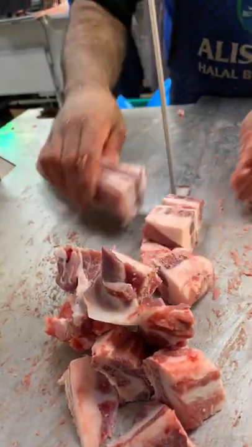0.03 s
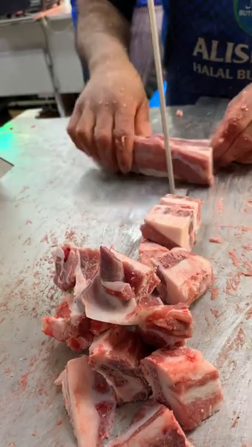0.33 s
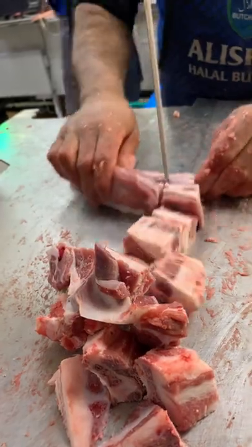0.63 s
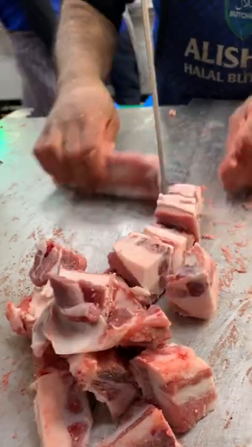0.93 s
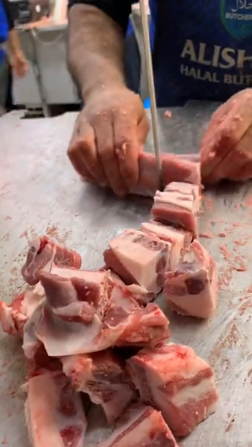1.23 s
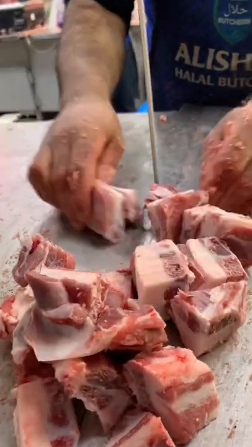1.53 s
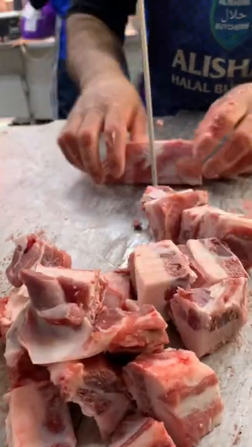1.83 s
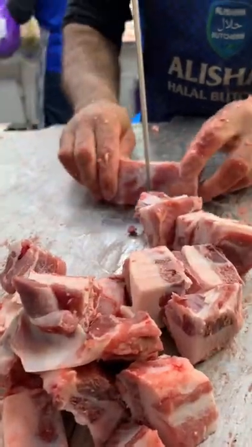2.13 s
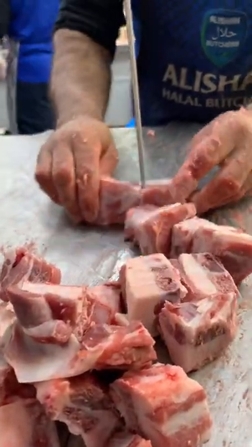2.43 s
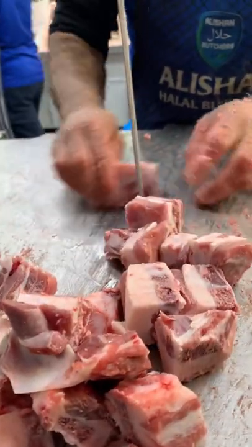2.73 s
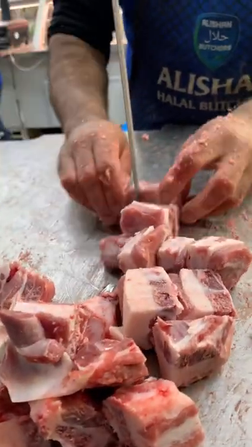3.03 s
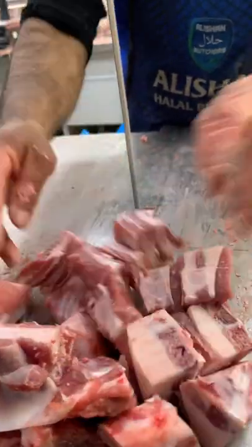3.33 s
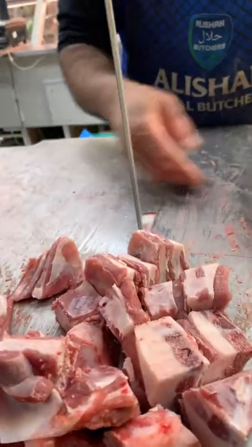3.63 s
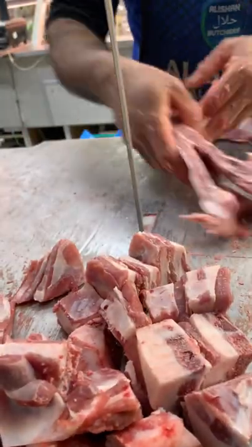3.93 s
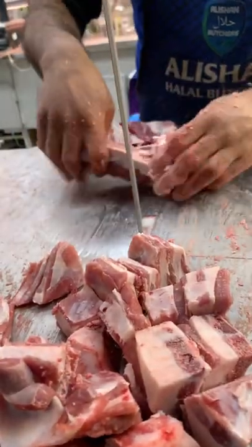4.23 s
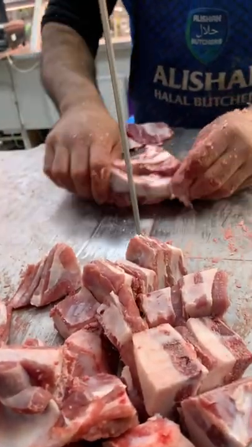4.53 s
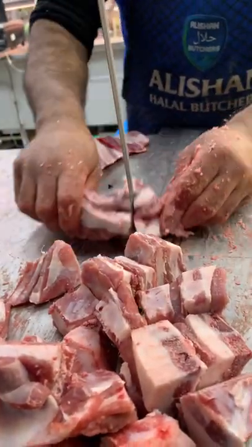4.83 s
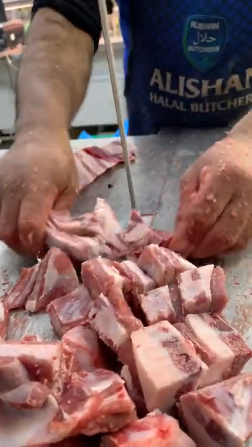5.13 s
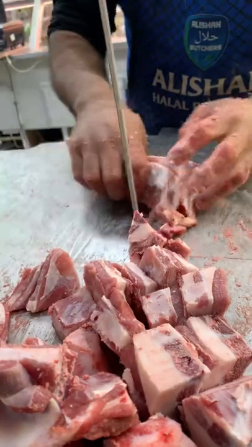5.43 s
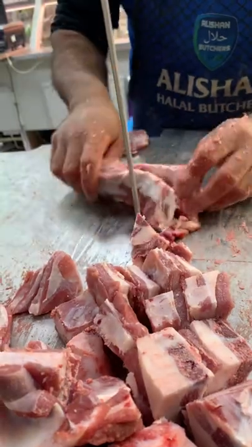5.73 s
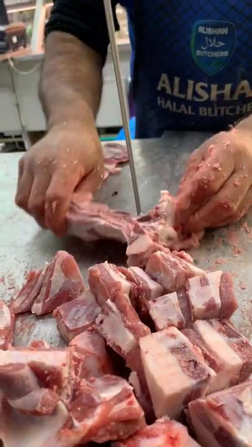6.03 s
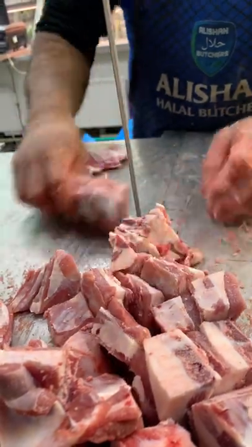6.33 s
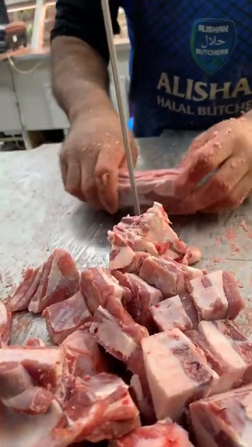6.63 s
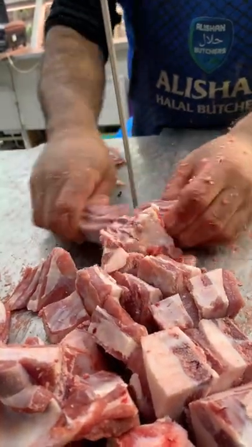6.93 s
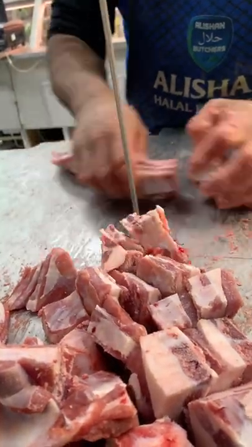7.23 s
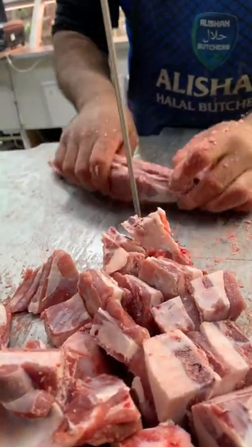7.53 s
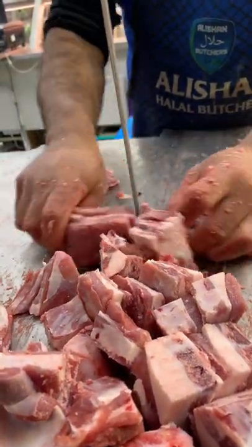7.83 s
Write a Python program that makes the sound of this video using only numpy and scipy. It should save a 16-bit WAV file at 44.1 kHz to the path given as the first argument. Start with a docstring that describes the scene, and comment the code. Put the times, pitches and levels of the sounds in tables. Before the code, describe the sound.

A butcher's bandsaw hums and hisses steadily while its blade rasps and screeches through meat and bone in eight short cuts.

```python
"""A butcher's bandsaw in the shop, close to a two-port stereo microphone. From the start the motor hums
and the blade hisses in its guides and rings the steel table. From 0.5 s four pieces of meat and bone go
through: the teeth rasp, sing on their passing rate, bite and screech, and the motor sags a little.
After 3.5 s wet meat ticks on the table. From 4.7 s come four more cuts, louder, and the recorder's
gain control ducks the hum after the loudest."""
import sys
import numpy as np
from scipy import signal
from scipy.fft import rfft, irfft, next_fast_len
from scipy.io import wavfile
from scipy.ndimage import uniform_filter1d, minimum_filter1d

SR = 44100
rng = np.random.default_rng(int(sys.argv[2]) if len(sys.argv) > 2 else 0)


def unload_wav(signal):
    """Save mono or channel-first audio to the path in sys.argv[1] as 16-bit WAV at rate SR, clipped to [-1, 1]."""
    wavfile.write(
        sys.argv[1],
        SR,
        np.round(np.clip(np.atleast_2d(signal).T, -1, 1) * 32767).astype(np.int16),
    )


N = 352359
T = np.arange(N) / SR
SHAFT_HZ, TOOTH_HZ = 25.0, 1846  # shaft turns and passing teeth per second, unloaded

# Levels in the tables are relative: each source adds its own gain.
# the saw swells and fades as the microphone moves: (time [s], hum [dB], hiss [dB], fizz [dB])
MIC_NEARNESS = [(0, -0.5, -37.5, -39.5), (1.5, 0.5, -39.5, -42), (3.1, 1, -41, -42), (4.3, 1, -38.5, -40.5),
                (5.7, 2.5, -37, -40), (6.5, 0, -39.5, -42.5), (7.99, -1.5, -38.5, -41)]
# motor hum: (multiple of the shaft rate, level [dB])
HUM_ORDERS = [(2, -52.5), (3, -60), (4, -46), (5, -41.5), (6, -52), (7, -32.5), (9, -70.5), (10, -55.5),
              (11, -46), (15, -70), (19, -57.5), (20, -60.5)]
# two higher motor whines as the microphone moves: (time [s], order 17 [dB], order 36 [dB])
MOTOR_WHINES = [(0, -47, -45), (.7, -41.5, -44), (1, -44, -56), (2.3, -43.5, -54.5), (3.1, -39.5, -54),
                (3.9, -42.5, -51), (5.7, -40.5, -54), (6.5, -45.5, -49.5), (7.99, -43, -50.5)]
# cabinet rumble: (frequency [Hz], level [dB])
RUMBLE_SPECTRUM = [(20, -31), (33, -19), (45, -15), (80, 1.5), (140, 1.5), (230, 2), (330, -10), (480, -8),
                   (750, -25), (1500, -30)]
# blade rubbing in its guides: (frequency [Hz], level [dB])
HISS_SPECTRUM = [(300, -17), (750, -4), (1000, -7.5), (1450, -2.5), (2000, -2.5), (2900, -9.5), (4200, -4),
                 (5800, -10), (8000, -34)]
# fine hiss of the teeth in the air: (frequency [Hz], level [dB])
FIZZ_SPECTRUM = [(2500, -5), (4800, -46), (6000, 9), (7500, 9.5), (9000, 5.5), (11000, 0.5), (12500, 7),
                 (14000, 2.5), (15500, -44)]
# ring of blade and table: (frequency [Hz], width [Hz], level [dB])
STEEL_MODES = [(1130, 180, 2), (1286, 9.5, 7), (1511, 59, 5.5), (1892, 41, 6.5), (2032, 68, 5.5),
               (2330, 140, -4), (2478, 87, 7), (2670, 39, 12.5), (2920, 74, 11), (3150, 40, 10),
               (3450, 100, 6.5), (3658, 56, 9.5), (4175, 44, 4.5), (4640, 46, 2.5), (4880, 52, 7.5),
               (5400, 68, 5.5)]
# a narrow band of hiss that drifts between 6.4 and 7 kHz: (time [s], frequency [Hz], level [dB])
DRIFTING_HUMP = [(0, 6380, -47.5), (2.2, 6520, -42.5), (3.3, 6670, -49.5), (5.5, 6990, -44),
                 (7.99, 6600, -48)]
# three resonances of the free blade: (frequency [Hz])
WHIRR_PITCHES = [1983, 2687, 3660]
# their unsteady strength: (time [s], low [dB], middle [dB], high [dB])
WHIRR_LEVELS = [(0, -47, -48, -66), (1.6, -52, -75, -55), (3.2, -45.5, -59, -48), (3.9, -48, -48.5, -53.5),
                (4.5, -42.5, -46, -45), (5.7, -56, -47, -45.5), (6.5, -53, -51, -40.5),
                (7.99, -45, -48, -46)]
# meat handled on the table: (time [s], level [dB], decay [s])
MEAT_TICKS = [(3.501, -31, .004), (3.6233, -27, 0.004), (3.9371, -35, .004), (5.498, -34, 0.0044),
              (7.42, -39, .004)]
# pieces pushed through the blade:
# (time [s], length [s], ease-in [s], ease-out [s], rasp [dB], push change by the end [dB], drag [dB])
PIECES = [(0.468, 0.21, 0.011, 0.032, -27.5, 2.5, -56), (1.195, 0.18, 0.034, 0.036, -26.5, 0, -52),
          (2.26, 0.2, 0.13, .03, -27, -10, -60), (2.95, 0.12, 0.049, 0.021, -29.5, -5, -54),
          (4.675, 0.23, 0.018, 0.11, -24, 3.5, -44), (5.841, 0.13, 0.041, 0.099, -20, 1.5, -53),
          (6.755, 0.19, 0.032, 0.027, -27.5, -15, -43), (7.632, 0.17, 0.015, 0.018, -12, -10, -45)]
# teeth meeting a hard wall of bone: (peak time [s], length [s], rasp [dB], grinding [dB], singing [dB])
BONE_BITES = [(0.462, 0.0056, -24.5, -38, -54), (0.489, 0.015, -20, -39, -57),
              (0.521, 0.019, -19, -38, -38), (0.56, 0.03, -31, -30, -43), (0.595, 0.0065, -22, -29, -47),
              (0.609, 0.012, -25, -34, -28.5), (0.645, 0.0046, -24, -33, -33),
              (1.231, 0.031, -31, -30, -52), (1.279, 0.036, -22.5, -29, -28),
              (1.338, 0.027, -27, -27.5, -34), (1.379, 0.024, -30.5, -33.5, -52),
              (2.331, 0.075, -19.5, -33.5, -32), (2.385, 0.029, -31, -31, -35),
              (2.449, 0.04, -24.5, -33, -44), (2.986, 0.036, -21, -32.5, -34),
              (3.048, 0.026, -25, -28.5, -32), (4.656, 0.0076, -25, -35, -46),
              (4.69, 0.015, -21, -26.5, -45), (4.744, 0.04, -35, -26, -49),
              (4.826, 0.063, -18.5, -22.5, -37), (4.889, 0.052, -22, -24, -26),
              (5.846, 0.019, -18, -27, -24.5), (5.88, 0.021, -11, -28, -53),
              (6.773, 0.023, -18.5, -25, -31), (6.831, 0.029, -16.5, -21.5, -38),
              (6.875, 0.04, -17, -20.5, -28), (7.623, 0.017, -12.5, -37, -41),
              (7.64, 0.022, -22, -25.5, -20), (7.733, 0.015, -24, -25, -12),
              (7.771, 0.046, -34, -26.5, -23.5)]
# rasp of the teeth: (frequency [Hz], level [dB])
RASP_SPECTRUM = [(300, -73), (800, -23.5), (1400, 1), (2100, -52), (3000, -14.5), (4500, -7), (6000, 4),
                 (7000, 9.5), (8200, 9.5), (9700, -5.5), (10500, 9.5), (11500, 9.5), (13000, 10),
                 (14300, 13.5), (15500, -20)]
# grinding in bone: (frequency [Hz], level [dB])
GRIND_SPECTRUM = [(500, -1), (1400, -8.5), (2050, 10.5), (2800, 2), (3600, 13), (4500, 3.5), (6000, -67),
                  (10000, -32)]
# low tooth tone, following the singing: (multiple of the tooth rate, level [dB])
SING_PARTIALS = [(1, 6.5), (2, -11.5), (3, 1.5)]
# high tooth tone, following the rasp: (multiple of the tooth rate, level [dB])
RASP_PARTIALS = [(3, 4), (4, 11.5), (5, 14.5), (6, 17), (7, 15), (8, -18.5)]
# the blade is pinched: (peak time [s], multiple of the tooth rate, level [dB], length [s])
PINCH_SQUEALS = [(.494, 4, -17, 0.0083), (.517, 7, -20, .012), (.65, 6, -15, 0.0091), (1.26, 7, -21, 0.031),
                 (1.265, 4, -32, 0.033), (1.282, 2, -38, .024), (1.345, 2, -29, 0.04),
                 (1.37, 4, -24, 0.025), (2.31, 6, -28, 0.039), (2.3, 4, -28, 0.045),
                 (2.332, 7, -25.5, .018), (2.317, 2, -38, 0.1), (2.447, 4, -22.5, .007),
                 (2.457, 2, -21.5, 0.011), (2.986, 2, -31, 0.035), (3.045, 2, -29, 0.035),
                 (2.985, 4, -26, 0.054), (3.041, 4, -19.5, 0.025), (4.698, 4, -14, 0.0097),
                 (4.74, 6, -17, 0.054), (4.774, 7, -15, 0.018), (4.82, 2, -22, 0.069),
                 (4.897, 2, -18, 0.018), (4.881, 3, -13.5, 0.01), (5.89, 6, -24, 0.011),
                 (5.959, 4, -15.5, 0.033), (5.955, 7, -21, 0.047), (6.822, 3, -18, 0.011),
                 (6.825, 4, -20, 0.02), (6.831, 7, -17, 0.015), (6.874, 5, -18, 0.03),
                 (6.86, 2, -22.5, 0.058), (6.879, 7, -16, .012), (6.883, 3, -17, 0.025),
                 (7.612, 2, -25, 0.0085), (7.651, 3, -20, .009), (7.713, 3, -24, 0.015),
                 (7.764, 6, -12.5, 0.015)]
# the blade twists in bone:
# (peak time [s], frequency [Hz], glide [Hz/s], width [Hz], level [dB], length [s])
TWIST_SCREECHES = [(.497, 2380, -8000, 300, -32, .008), (0.53, 5650, 0, 500, -33, .016),
                   (0.568, 3050, 3000, 300, -27, 0.015), (0.563, 6240, 0, 700, -24, .011),
                   (.597, 6700, 0, 1300, -18, 0.0043), (.597, 9600, 0, 1800, -18, .004),
                   (1.249, 1996, -1000, 220, -32, 0.049), (1.292, 5900, 8000, 900, -35, 0.018),
                   (1.342, 2050, 0, 250, -27, .014), (1.343, 4500, 0, 250, -40, .025),
                   (2.34, 5730, 0, 600, -36, .03), (2.441, 3430, 8000, 250, -28, .02),
                   (3.02, 6720, 0, 1200, -29, 0.048), (3.031, 5770, 0, 550, -29, 0.012),
                   (4.668, 12200, 0, 1800, -20, .005), (4.722, 12100, 12, 1710, -18.5, 0.064),
                   (4.78, 2060, 0, 250, -26, 0.0036), (4.816, 7030, -3000, 602, -21, 0.035),
                   (4.865, 1990, -2000, 296, -37, 0.04), (5.843, 3300, -10000, 502, -32, 0.012),
                   (5.852, 10430, 0, 500, -16, 0.0078), (5.853, 6760, 15000, 450, -18, 0.0074),
                   (5.86, 4830, -20000, 702, -27, 0.013), (6.782, 2378, 0, 403.3, -22, 0.0065),
                   (6.829, 4530, 6002, 1100, -23, 0.039), (6.831, 5990, -10000, 803, -26, 0.015),
                   (6.839, 7030, -20000, 385, -11, 0.0066), (7.616, 7080, 0, 700, -34, 0.0048),
                   (7.648, 6250, 0, 905, -31, .009), (7.722, 3680, 0, 220, -20, 0.034),
                   (7.761, 1890, 0, 179, -28, 0.042)]
# how alike the two microphone ports sound: (frequency [Hz], likeness [0-1])
PORT_LIKENESS = [(60, .995), (200, .95), (450, .8), (800, .6), (2200, .55), (3000, .4), (3700, .22),
                 (4300, .45), (5000, .8), (7000, .94), (15000, .94)]
# the machine reaches the left port first: (frequency [Hz], phase lead [rad])
MACHINE_PHASE = [(60, 0), (170, .25), (450, .8), (850, 2.5), (1450, .6), (2000, 1.7), (3000, 3.2),
                 (4900, 3.2), (6900, 6.28), (9700, 9.42), (12400, 12.57), (15100, 15.7)]
# the cut at the left port against the right: (frequency [Hz], phase lead [rad])
CUT_PHASE = [(60, 0), (500, -1), (1000, -2.6), (1900, -.5), (2600, -2.8), (3200, -3.2), (4900, -3.1),
             (6900, 0), (9700, 3.14), (12400, 6.28), (15100, 9.42)]


def gain_of(db):
    """Decibels to amplitude."""
    return 10 ** (np.asarray(db) / 20)


def evened(x):
    """Scales to rms 1."""
    return x / np.sqrt(np.mean(x ** 2) + 1e-20)


def read(points, hz):
    """Reads a table on a log-frequency axis."""
    f, value = np.transpose(points)
    return np.interp(np.log(hz + 1), np.log(f + 1), value)


def curve(rows, column):
    """One column of a table over time."""
    rows = np.array(rows)
    return np.interp(T, rows[:, 0], rows[:, column])


def swell(s, length):
    """A smooth rise and fall that peaks at time s."""
    return np.exp(-2 * np.minimum(((T - s) / length) ** 2, 20))


def lagged(x, lag_s):
    """Follows x sluggishly."""
    keep = np.exp(-1 / (lag_s * SR))
    return signal.lfilter([1 - keep], [1, -keep], x)


def drift(rate_hz, step=32):
    """Smooth random wander of rms 1, no faster than about rate_hz."""
    count = N // step + 2
    rolloff = 1 + (np.fft.rfftfreq(count, step / SR) / rate_hz) ** 4
    slow = irfft(rfft(rng.standard_normal(count)) / rolloff, count)
    return np.interp(np.arange(N) / step, np.arange(count), evened(slow))


def flicker(depth_db, rate_hz=90):
    """Quick random changes of gain, of rms 1."""
    return evened(gain_of(depth_db * np.tanh(drift(rate_hz))))


def filtered(x, response):
    """Applies a frequency response, given as a function of Hz."""
    size = next_fast_len(N + 4096, True)
    return irfft(rfft(x, size) * response(np.fft.rfftfreq(size, 1 / SR)), size)[..., :N]


def noise(colour, gate=1):
    """Two streams of gated, coloured noise of rms 1: near and scattered."""
    return evened(filtered(gate * rng.standard_normal((2, N)), colour))


def band(hz, width_hz):
    """Two streams of narrow noise of rms 1 round a frequency that may move."""
    carrier = np.exp(2j * np.pi * np.cumsum(hz * np.ones(N)) / SR)
    return np.array([(carrier * (drift(width_hz) + 1j * drift(width_hz))).real for _ in range(2)])


def shop_murmur(s=1.9, length_s=0.18, hz=590, db=-45.5):
    """A faint, dull swell of noise somewhere in the shop."""
    return band(hz, width_hz=60) * gain_of(db) * np.exp(-((T - s) / length_s) ** 2)


def motor(speed, waver_db=1.6, waver_rad=0.38, rumble_db=-38.5, lumpy_db=2.0):
    """Harmonics of the turning shaft waver in the rumble of the cabinet."""
    turns = np.cumsum(SHAFT_HZ * speed) / SR
    whines = [(17, curve(MOTOR_WHINES, 1)), (36, curve(MOTOR_WHINES, 2))]
    hum = np.zeros(N)
    for order, db in HUM_ORDERS + whines:
        level = gain_of(db + waver_db * drift(3.8))
        hum += level * np.cos(2 * np.pi * (order * turns + rng.random()) + waver_rad * drift(1.85))
    rumble = noise(lambda hz: gain_of(read(RUMBLE_SPECTRUM, hz)))
    rumble *= gain_of(rumble_db + lumpy_db * drift(8.6))
    return rumble + np.sqrt(2) * np.array([hum, np.zeros(N)])  # the hum has no scattered part


def steel(hz, ring_db):
    """Gain of the blade and table resonances."""
    peaks = sum(gain_of(db + ring_db) ** 2 / (1 + (2 * (hz - f) / width) ** 2)
                for f, width, db in STEEL_MODES)
    return np.sqrt(1 + peaks)


def plate(hz):
    """Gain of the many close, weak modes of the steel table, some tens of Hz apart."""
    grid_hz = np.arange(0, SR / 2, 22)
    ripple_db = 3.2 * np.clip(rng.standard_normal(len(grid_hz)), -1.6, 1.6) / (1 + grid_hz / 12000)
    return gain_of(np.interp(hz, grid_hz, ripple_db))


def guides(strain, hiss_db=3, ring_db=4.0, flutter_db=1.0, strain_db=4):
    """The blade rubs through its guides and rings the steel; its fizz and a drifting narrow band of hiss grow
    under strain."""
    rub = gain_of(flutter_db * drift(40))
    hiss = noise(lambda hz: gain_of(read(HISS_SPECTRUM, hz)) * steel(hz, ring_db) * plate(hz), rub)
    hiss *= gain_of(hiss_db + curve(MIC_NEARNESS, 2))
    fizz = noise(lambda hz: gain_of(read(FIZZ_SPECTRUM, hz)) * plate(hz), rub)
    fizz *= gain_of(curve(MIC_NEARNESS, 3))
    whistle = band(curve(DRIFTING_HUMP, 1), width_hz=480) * gain_of(curve(DRIFTING_HUMP, 2))
    return hiss + (fizz + whistle) * gain_of(strain_db * strain)


def whirr(width_hz=22, flutter_db=3.0, wander_hz=14):
    """The running blade flutters: its resonances swell, fade and wander a little in pitch."""
    out = np.zeros((2, N))
    for column, hz in enumerate(WHIRR_PITCHES, 1):
        ring = band(hz + wander_hz * drift(5.95), width_hz)
        out += ring * flicker(flutter_db, rate_hz=13) * gain_of(curve(WHIRR_LEVELS, column))
    return out


def meat_ticks():
    """Short bright smacks of wet meat on steel."""
    envelope = sum(gain_of(db) * (T >= s) * np.exp(-abs(T - s) / decay) for s, db, decay in MEAT_TICKS)
    return envelope * noise(lambda hz: gain_of(read(RASP_SPECTRUM, hz)))


def feed(ease_db=20, drag_s=0.06):
    """Rasp amplitude as each piece is eased in, pushed and let go, and its cut face drags on the blade."""
    out = np.zeros(N)
    for s, length, ease_in, ease_out, db, push_db, drag_db in PIECES:
        progress = np.clip((T - s) / length, 0, 1)
        eased_off = np.maximum((s - T) / ease_in, 0) + np.maximum((T - s - length) / ease_out, 0)
        out += gain_of(db + push_db * progress - ease_db * np.minimum(eased_off, 10))
        out += gain_of(drag_db) * (T > s + length) * np.exp(-abs(T - s - length) / drag_s)
    return out


def bites():
    """Amplitudes of rasp, grinding and singing while the teeth are in hard bone."""
    return sum(gain_of(levels)[:, None] * swell(s, length) for s, length, *levels in BONE_BITES)


def speed_under(load, sag=.011, inertia_s=0.062):
    """The wheels slow a little under load and take a moment to recover."""
    return 1 - sag * lagged(np.tanh(load / .04), inertia_s)


def screeches():
    """The blade twists in bone: short bursts of gliding resonance, rough with the chatter of the teeth."""
    out = np.zeros((2, N))
    t = np.arange(-.1, .1, 1 / SR)
    offset_hz = np.fft.fftfreq(len(t), 1 / SR)
    for s, hz, glide, width, db, length in TWIST_SCREECHES:
        real, imag = rng.standard_normal((2, 2, len(t)))
        chatter = np.fft.ifft((real + 1j * imag) / (1 + (offset_hz / width) ** 2) ** 2)
        tone = evened((chatter * np.exp(2j * np.pi * (hz + glide * t / 2) * t)).real)
        start = round((s + t[0]) * SR)
        out[:, start:start + len(t)] += gain_of(db) * np.exp(-2 * (t / length) ** 2) * tone
    return out


def squeals(teeth, level_db=-1, rough_db=7.5, smear_rad=0.54):
    """The pinched blade locks onto one harmonic of the tooth rate for a moment."""
    out = np.zeros((2, N))
    for multiple in sorted({row[1] for row in PINCH_SQUEALS}):
        envelope = sum(gain_of(db) * swell(s, length)
                       for s, k, db, length in PINCH_SQUEALS if k == multiple)
        for stream in out:
            rough = flicker(rough_db, rate_hz=120)
            waver = smear_rad * drift(140) + drift(6.1)
            stream += envelope * rough * np.cos(2 * np.pi * multiple * teeth + waver)
    return np.sqrt(2) * gain_of(level_db) * out


def tooth_tone(teeth, partials, smear_rad, flare_db):
    """Harmonics of the tooth rate; each flares, fades and wavers as the blade twists in the slot."""
    out = np.zeros((2, N))
    for multiple, db in partials:
        for stream in out:
            waver = smear_rad * (drift(35) + .3 * drift(160))
            level = gain_of(db) * flicker(flare_db, rate_hz=25)
            stream += level * np.cos(2 * np.pi * multiple * teeth + waver)
    return evened(out)


def blade_flex(x, depth_db=3.4):
    """Resonances of the flexing blade come and go, each some hundreds of Hz wide and about 10 ms long."""
    spectra = signal.stft(x, nperseg=256)[2]
    field = uniform_filter1d(rng.standard_normal(spectra.shape[1:]), size=3, axis=0)  # across frequency
    field = evened(uniform_filter1d(field, size=4, axis=1))  # across time
    gains = evened(gain_of(depth_db * np.clip(field, -2, 2)))
    return signal.istft(spectra * gains, nperseg=256)[1][:, :N]


def cutting(speed, push, bite, rasp_db=-1, high_tone_db=-3.5, ring_db=-3, chip_db=4, jitter=.006):
    """Each tooth tears off a chip of random size; the train of teeth also sings."""
    teeth = np.cumsum(TOOTH_HZ * speed * (1 + jitter * drift(50))) / SR  # teeth passed so far
    chip_size = gain_of(chip_db * rng.uniform(0.79, 1, N))[teeth.astype(int)]
    chips = chip_size * (1.6 + np.exp(-(teeth % 1) / 0.15))  # strongest as each tooth enters
    rasp = noise(lambda hz: gain_of(read(RASP_SPECTRUM, hz)) * plate(hz), chips)
    grind = noise(lambda hz: gain_of(read(GRIND_SPECTRUM, hz)) * steel(hz, ring_db) * plate(hz), chips)
    # the level flickers as the teeth cross hard and spongy tissue
    grainy_push = push * flicker(depth_db=3)
    rasping, grinding, singing = np.hypot(bite, grainy_push * gain_of([[0], [-15], [-17]]))
    rasp *= gain_of(rasp_db) * rasping * flicker(depth_db=3, rate_hz=210)
    grind *= grinding * flicker(depth_db=3)
    tearing = blade_flex(rasp + grind)
    high_tone = tooth_tone(teeth, RASP_PARTIALS, smear_rad=1.12, flare_db=4) * rasping
    low_tone = tooth_tone(teeth, SING_PARTIALS, smear_rad=1.19, flare_db=5) * singing
    return tearing + high_tone * gain_of(high_tone_db) + low_tone + squeals(teeth)


def microphone(streams, phase_lead):
    """The left port hears the near sound; the right hears it phase-shifted, with scattered sound."""
    def likeness(hz):
        return np.clip(read(PORT_LIKENESS, hz), 0, 1)
    near, scattered = streams
    shifted = filtered(near, lambda hz: likeness(hz) * np.exp(-1j * read(phase_lead, hz)))
    diffuse = filtered(scattered, lambda hz: np.sqrt(1 - likeness(hz) ** 2))
    return np.array([near, shifted + diffuse])


def gain_control(x, threshold_db=-19, sense_s=0.022, hold_s=0.13, glide_s=0.0048):
    """On a loud cut the recorder turns everything down; the gain holds, then glides back."""
    level_db = 10 * np.log10(lagged((x ** 2).mean(0), sense_s) + 1e-12)
    excess_db = np.maximum(level_db - threshold_db, 0)
    half = int(hold_s * SR / 2)
    held_db = -minimum_filter1d(-excess_db, 2 * half + 1, origin=half)
    return x * gain_of(-lagged(held_db, glide_s))


def scene(full_load_db=-20, recover_s=0.35, hum_sink_db=6):
    """The saw from close by; under load the hum sinks and the blade fizzes more."""
    push, bite = feed(), bites()
    bone_rasp, bone_grind, _ = bite
    speed = speed_under(bone_grind)
    strain = lagged(np.tanh((push + bone_rasp) / gain_of(full_load_db)), recover_s)
    hum = motor(speed) * gain_of(curve(MIC_NEARNESS, 1) - hum_sink_db * strain)
    machine = microphone(hum + guides(strain) + whirr() + shop_murmur(), MACHINE_PHASE)
    cuts = microphone(cutting(speed, push, bite) + screeches() + meat_ticks(), CUT_PHASE)
    return (machine + cuts) * gain_of([[-.2], [.2]])  # a touch louder on the right


def record(dry, ceiling=.72, edge_hz=15450):
    """The recorder: gain control, the loudest peaks rounded off, then the band limit."""
    ducked = gain_control(dry)
    rounded = ducked / (1 + (ducked / ceiling) ** 4) ** (1 / 4)
    lowpass = signal.firwin(511, edge_hz, window=("kaiser", 9), fs=SR)
    return signal.oaconvolve(rounded, lowpass[None], "same")


dry = scene()
out = record(dry)
unload_wav(out)
```